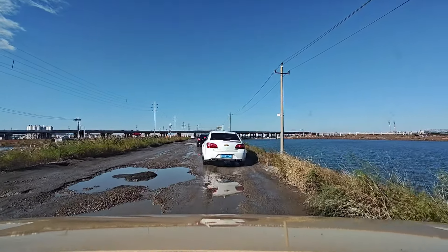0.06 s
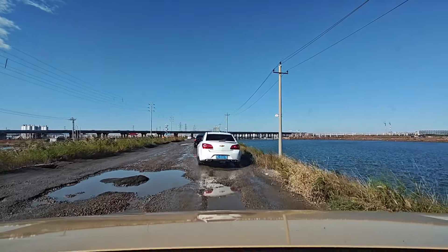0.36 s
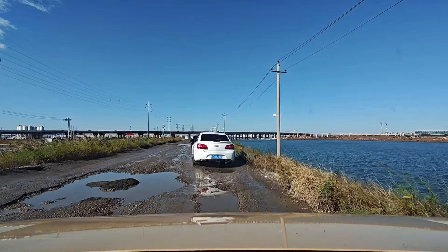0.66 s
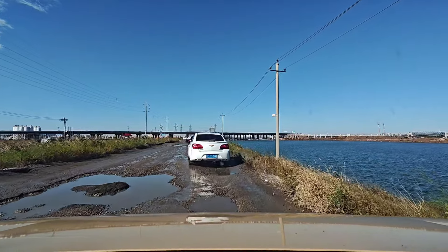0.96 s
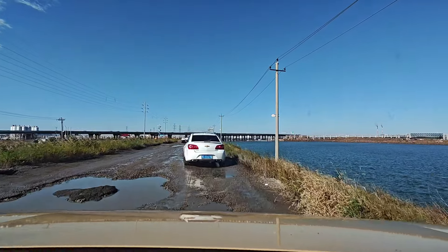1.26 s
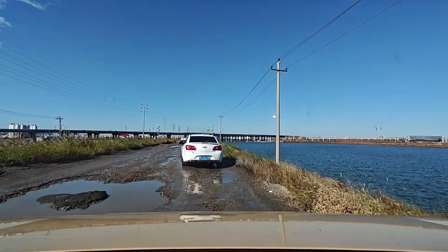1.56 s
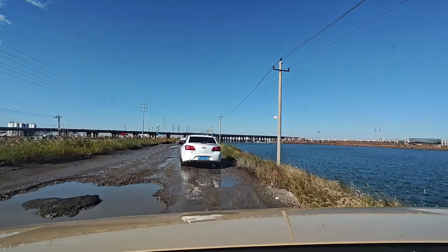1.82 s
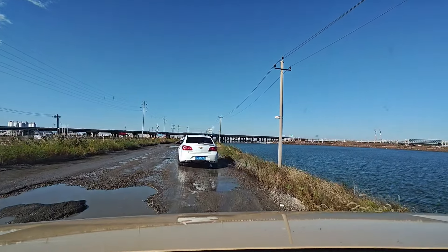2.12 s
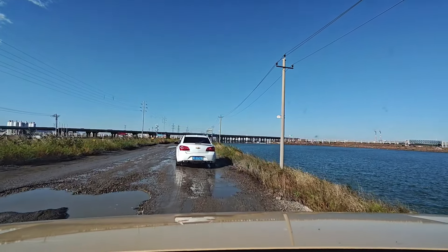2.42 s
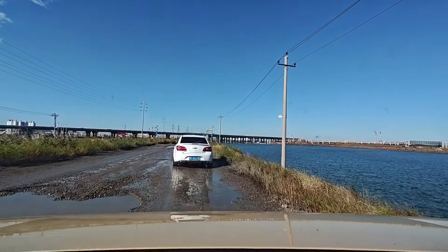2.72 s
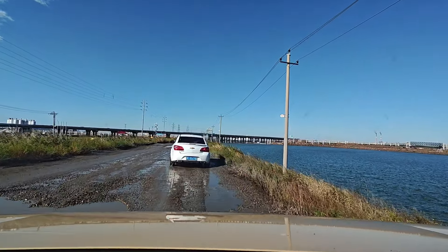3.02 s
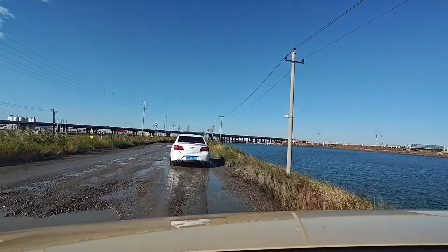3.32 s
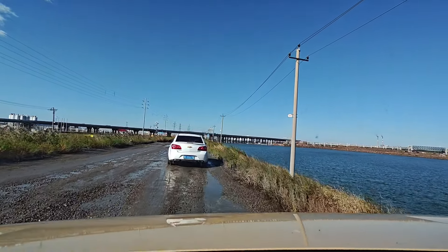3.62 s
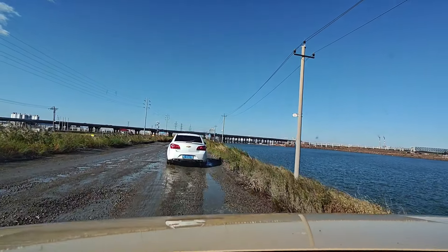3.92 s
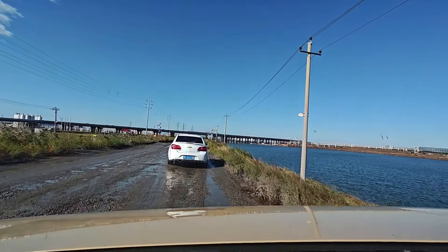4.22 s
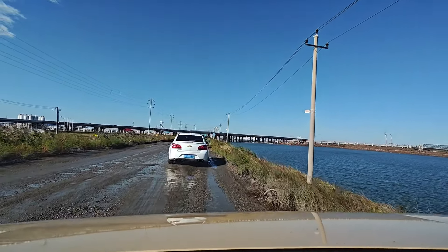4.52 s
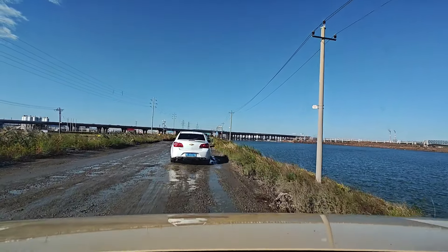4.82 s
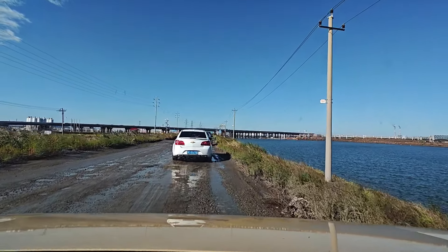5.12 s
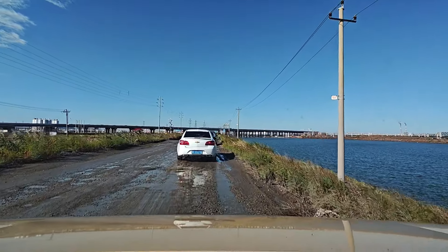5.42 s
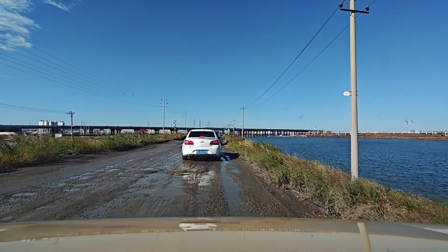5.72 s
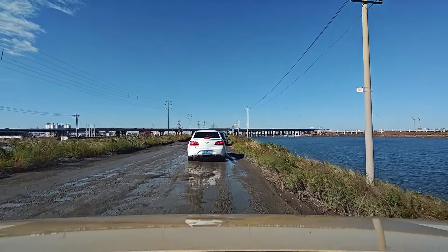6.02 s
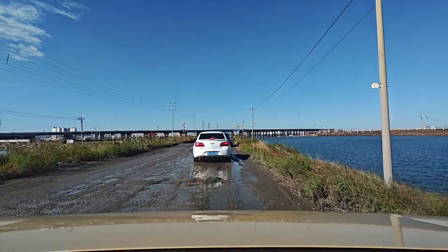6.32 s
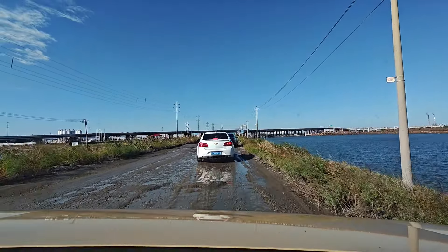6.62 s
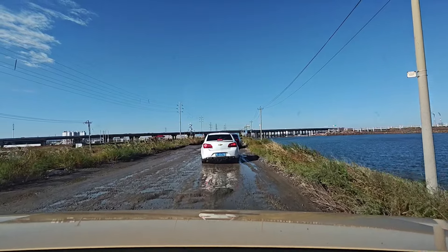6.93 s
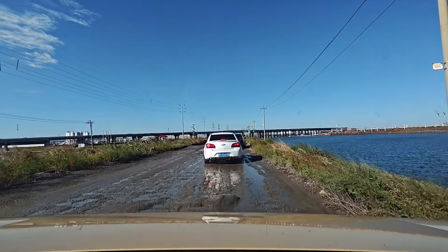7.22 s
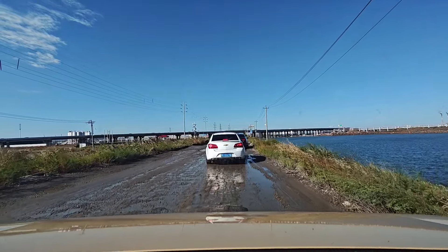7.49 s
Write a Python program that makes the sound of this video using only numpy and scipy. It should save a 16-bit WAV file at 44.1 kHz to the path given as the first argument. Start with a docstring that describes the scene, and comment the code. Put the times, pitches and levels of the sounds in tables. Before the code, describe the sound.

A low, throbbing tyre rumble and engine drone run for about eight seconds, heard from inside a car crawling along a wet, potholed dirt road. Faint grit crackles under the wheels. A dull thump and light plastic rattles open the sound. From about 1.3 to 2.2 seconds the engine rises in pitch and level, with knocks near 1.4 and 1.8, then eases. A firm thump lands at 2.7 seconds. From 3.3 to 4.6 the suspension knocks repeatedly and the cabin booms, hardest at 4 seconds. Loose trim clacks, chatters and pings with the jolts, loudest between 4 and 5.4 seconds, with a few tiny squeaks and brief swells of gritty high hiss. Further thumps come around 5.6, 5.9 and 6.7 seconds as the rattles thin out. From 6.5 seconds the engine pulls again and the rumble grows, with scattered knocks and clicks to the end.

```python
"""A low tyre rumble and an engine drone fill a car that crawls along a wet, potholed dirt road.
The tyres shake the body, the engine swells when it pulls, and wet grit crackles under the wheels.
Potholes thump through the suspension and make the cabin air boom. Loose trim chatters, pings and
squeaks with the jolts, and a gritty high hiss swells briefly around the louder rattles."""
import sys
import numpy as np
from scipy import signal
from scipy.fft import rfft, irfft, next_fast_len
from scipy.io import wavfile
from scipy.ndimage import uniform_filter1d, minimum_filter1d

SR = 44100
rng = np.random.default_rng(int(sys.argv[2]) if len(sys.argv) > 2 else 0)


def file_out(sig):
    """Save sig as 16-bit WAV at sys.argv[1]."""
    # one column per channel
    cols = np.atleast_2d(sig).T
    # limit, then scale
    lim = np.clip(cols, -1, 1)
    pcm = np.round(lim * 32767).astype(np.int16)
    wavfile.write(sys.argv[1], SR, pcm)


N = 342039
TIME = np.arange(N) / SR


def undb(db):
    """Decibels to gain."""
    return 10 ** (np.asarray(db) / 20)


def unit(x):
    """Scale to an rms of one."""
    return x / np.sqrt(np.mean(x ** 2) + 1e-20)


def freqs(x):
    """Frequency axis of a sound's spectrum."""
    return np.maximum(np.fft.rfftfreq(next_fast_len(x.shape[-1]), 1 / SR), 1)


def shape(x, gain):
    """Filter by a gain for each frequency."""
    size = next_fast_len(x.shape[-1])
    return irfft(rfft(x, size) * gain, size)[..., :x.shape[-1]]


def colour(x, points):
    """EQ through (Hz, dB) points joined on a log-frequency axis."""
    hz, db = np.transpose(points)
    return shape(x, undb(np.interp(np.log(freqs(x)), np.log(hz), db)))


def band(x, lo_hz, hi_hz):
    """Causal band-pass."""
    return signal.sosfilt(signal.butter(3, [lo_hz, hi_hz], "band", fs=SR, output="sos"), x)


def walk(rate_hz):
    """Smooth random drift with a spread near one."""
    knots = rng.standard_normal(4096)
    return np.interp(TIME * rate_hz, np.arange(len(knots)), knots)


def add(out, s, sound):
    """Mix a sound in from time s."""
    start = int(np.clip(s * SR, 0, N - 1))
    out[:, start:start + sound.shape[-1]] += sound[..., :N - start]


def ring_out(t, rise_s, t60_s):
    """Envelope of a struck part: a short push, then free decay."""
    return (1 - np.exp(-t / rise_s)) * undb(-60 * t / t60_s)


def at_ports(common, left, right, bearing=1, lag_s=0.00064):
    """Sound from the right (bearing 1) reaches the left mic port late; each has its own reflections."""
    return np.array([np.roll(common, int(bearing * lag_s * SR)) + left, common + right])


# Stereo width of the road noise: freq_hz, side_minus_mid_db
ROAD_WIDTH = [(30, -24), (80, -11.5), (170, -14), (280, -12), (500, -2), (1000, 1.5)]
def road_noise():
    """Noise of the body panels: alike left and right in the bass, wide above."""
    mid, side = rng.standard_normal((2, N))
    return mid + colour(side, ROAD_WIDTH) * np.array([[1], [-1]])


# Bass-heavy tone of the car body: freq_hz, gain_db
ROAD_COLOUR = [(18, 4), (48, 7.5), (141, -3), (167, -9.5), (215, -10.5), (297, -17), (420, -24), (520, -27),
               (610, -32), (760, -26.5), (860, -31.5), (970, -26), (1045, -26), (1150, -34), (1500, -33.5),
               (2500, -37)]
def rumble(level_db, lo_hz, hi_hz, lumpy_db, lumps_per_s):
    """One register of the body shaken by the tyres; lumps in the dirt make it throb."""
    noise = band(colour(road_noise(), ROAD_COLOUR), lo_hz, hi_hz)
    return unit(noise * undb(lumpy_db * walk(lumps_per_s))) * undb(level_db)


# The engine pulls twice and coasts between: time_s, firing_hz, level_db
ENGINE_REVS = [(0, 29.46, -25.5), (1, 28.73, -29.5), (1.3, 46.14, -22), (1.549, 55, -18),
               (1.8, 58.48, -20.5), (2.1, 55, -17), (2.351, 46.05, -25), (3.2, 45.2, -22.5),
               (4.3, 43.03, -30), (5.5, 41.02, -26), (6.35, 43.73, -30), (6.519, 49.03, -18),
               (6.78, 54.3, -17.5), (6.97, 50.03, -25), (7.2, 48.36, -17), (7.518, 48.96, -15.5),
               (7.76, 57.6, -16)]
# Partials of the drone: multiple_of_firing_rate, level_db
ENGINE_ORDERS = [(.5, -24), (1, -1), (1.5, -36), (2, -8), (3, -32), (4, -13)]
def engine(wander=0.0056, flutter_db=0.5):
    """The low orders of a four-cylinder engine boom in the cabin, each a little unsteady."""
    s, hz, db = np.transpose(ENGINE_REVS)
    firing_hz = np.interp(TIME, s, hz) * (1 + wander * walk(18))
    phase = 2 * np.pi * np.cumsum(firing_hz) / SR
    drone = sum(undb(order_db + flutter_db * walk(7.7)) * np.sin(order * phase)
                for order, order_db in ENGINE_ORDERS)
    return unit(drone) * undb(np.interp(TIME, s, db))


# Broad tone of the plastic trim: freq_hz, gain_db
TRIM_COLOUR = [(300, 10), (520, 10.5), (760, 4), (880, 2.5), (1100, -2.5), (1400, -4.5), (1750, -6.5),
               (2100, -7.5), (2900, -11.5), (3700, -10.5), (5400, -10), (7200, -8), (8500, -15.5),
               (13500, -15.5), (15500, -22)]
# Its narrow resonances: centre_hz, width_hz, lift_db
TRIM_MODES = [(1050, 110, 5), (1420, 110, 2), (2030, 90, 2.5), (2250, 70, 3), (2500, 140, 3.5),
              (3270, 110, 3.5), (6400, 300, 2)]
def trim_tone(x):
    """The trim lends its colour and resonances to whatever sounds through it."""
    axis_hz = freqs(x)
    lift_db = sum(db / (1 + (2 * (axis_hz - hz) / width) ** 2) for hz, width, db in TRIM_MODES)
    return shape(colour(x, TRIM_COLOUR), undb(lift_db))


def crackle(noise, grains_per_s, spread_db, t60_s, lo_hz, hi_hz):
    """Many small grains and a few large ones strike the underbody; each leaves a short, noisy ring."""
    sizes = undb(spread_db * np.minimum(rng.exponential(size=N), 3.5))
    strikes = (rng.random(N) < grains_per_s / SR) * sizes ** 2
    decay = np.exp(-2 * np.log(1000) / (t60_s * SR))
    energy = signal.lfilter([1], [1, -decay], strikes)
    return unit(band(noise * np.sqrt(energy), lo_hz, hi_hz))


# Brief swells of gritty high hiss around the louder rattles: peak_s, half_length_s, level_db
HISS_SWELLS = [(1.774, 0.28, -56), (3.44, 0.046, -43.5), (3.79, 0.069, -44), (4.467, 0.091, -46.5),
               (4.766, 0.046, -51), (5.107, 0.084, -47.5), (7.05, 0.029, -48.5)]
def hiss_level(grit_db, clump_db=2.0, clumps_per_s=22):
    """Level of the gritty hiss in dB: the road's own grit plus brief swells, all in clumps."""
    swells = sum(undb(db) ** 2 * np.exp(-np.minimum(((TIME - s) / half_s) ** 2, 20))
                 for s, half_s, db in HISS_SWELLS)
    return 10 * np.log10(undb(grit_db) ** 2 + swells) + clump_db * walk(clumps_per_s)


def gravel(hiss_db, stones_db, chips_db=-4.5):
    """Wet grit sizzles in the wheel arches, chips tick on the floor pan, stones crunch under the tread."""
    noise = trim_tone(at_ports(*rng.standard_normal((3, N))))
    fine = crackle(noise, grains_per_s=600, spread_db=3.0, t60_s=0.045, lo_hz=2980, hi_hz=18000)
    chips = crackle(noise, grains_per_s=220, spread_db=5.5, t60_s=0.038, lo_hz=1630, hi_hz=7040)
    stones = crackle(noise, grains_per_s=190, spread_db=9.5, t60_s=0.11, lo_hz=823, hi_hz=2350)
    return fine * undb(hiss_db) + chips * undb(hiss_db + chips_db) + stones * undb(stones_db)


# Wheels hitting holes: start_s, knock_db, knock_pitch_hz, knock_t60_s, boom_db, clunk_db
POTHOLES = [(0.003,-7,144,0.072,-14,-35), (0.624,-12.5,249,0.14,-26,-46), (1.388,-6.5,272,0.065,-13,-23.5),
            (1.829,-6.5,146,0.13,-12.5,-27), (2.345,-17,308,0.12,-20,-18), (2.46,-21.5,386,0.14,-19,-31),
            (2.672,-1.5,214,0.04,-1,-24.5), (2.745,-19.5,218,0.29,-29,-31), (2.999,-15.5,236,0.16,-19,-21),
            (3.3206,-4.5,217.4,0.33,-28,-26), (3.358,-6,205,0.1,-4,-43), (3.429,-6,166.5,0.086,-10,-48),
            (3.46,-12,203.4,0.23,-4.5,-39), (3.898,-4.5,195,0.18,-17,-19.5), (3.92,-1,174,0.045,-16,-36),
            (4.002,-29,337,0.068,-19,-23.5), (4.036,4.5,220,0.037,1,-27.5), (4.481,-13,291,0.1,-28,-26),
            (4.532,-6,203,0.091,-32,-15.5), (4.553,-1.5,175,0.083,-27,-29),
            (5.126,-14.5,249.7,0.27,-16.5,-28), (5.341,-26,326,0.09,-34,-21.5),
            (5.563,-4,208,0.073,-3.5,-37), (5.877,-7.5,269.4,0.1,-12,-37), (6.429,-21.5,317.7,.15,-22,-33),
            (6.444,-21.5,320,0.11,-24,-19.5), (6.638,-7.5,252,0.066,-22,-37), (6.672,-8.5,155,0.12,-17,-36),
            (6.692,-8,162,0.12,-23,-39), (6.915,-15,315,0.076,-15,-22), (7.048,-29,152,.11,-1.5,-39),
            (7.608,-14,224.6,0.16,-20,-30), (7.705,-16.5,221,0.15,-17,-40)]
# The ring of a suspension joint: pitch_hz, level_db, t60_s
JOINT_MODES = [(304, 3, 0.11), (375, 3, 0.1), (448, 2.5, 0.097), (536, -14.5, 0.033), (720, -11, 0.049)]
def thumps(tone_db=1.5, shudder_db=-10, clunk_gain_db=1.5, boom_gain_db=2.0, boom_hz=78.9):
    """Each hole rings the suspension, shakes the panels, clunks a joint and booms the cabin air."""
    out, t = np.zeros((2, N)), TIME[:SR // 3]
    shudder = undb(shudder_db) * unit(band(road_noise(), 182, 324))
    sag = 1 + 0.22 * np.exp(-t / 0.028)  # the boom starts sharp and sags as the load eases
    boom = ring_out(t, rise_s=0.0075, t60_s=0.2) * np.sin(2 * np.pi * boom_hz * np.cumsum(sag) / SR)
    for s, knock_db, hz, t60_s, boom_db, clunk_db in POTHOLES:
        here = np.minimum(int(s * SR) + np.arange(len(t)), N - 1)
        tone = undb(tone_db) * np.sin(2 * np.pi * hz * t)
        knock = undb(knock_db) * ring_out(t, 0.0019, t60_s) * (tone + shudder[:, here])
        clunk = 0
        for mode_hz, mode_db, mode_t60_s in JOINT_MODES:
            loaded_hz = mode_hz * (1 + 0.052 * rng.standard_normal())  # the load detunes each mode
            phase = 2 * np.pi * loaded_hz * t + 1.67 * rng.standard_normal((2, 1))  # sides out of step
            clunk += undb(mode_db) * ring_out(t, 0.001, mode_t60_s) * np.sin(phase)
        add(out, s, knock + undb(clunk_db + clunk_gain_db) * clunk + undb(boom_db + boom_gain_db) * boom)
    return out


def trim_click(t60_s=0.04, echo_db=8.8, diffuse_db=4.0):
    """One plastic click and its dense returns from the glass and panels."""
    t = TIME[:SR // 20]
    common, left, right = rng.standard_normal((3, len(t))) * undb(-60 * t / t60_s)
    echo_gain = undb(echo_db) / np.sqrt(2 * np.sum(common ** 2))
    diffuse_gain = echo_gain * undb(diffuse_db)
    click = (t == 0) + echo_gain * common
    return at_ports(click, diffuse_gain * left, diffuse_gain * right, bearing=rng.random())


def panel_colour(spread_db=0.4, count=36):
    """The uneven resonances of one loose part, as (Hz, dB) points."""
    return np.column_stack([np.geomspace(500, 16000, count), spread_db * rng.standard_normal(count)])


# Loose trim, from hollow clack to bright tick:
# hit_s, clack_db, clatter_db, tick_db, build_s, decay_s, left_minus_right_db
RATTLES = [(0.0827, -58, -43, -55, 0.001, 0.0018, -3), (0.1053, -33, -38.5, -44, 0.0012, 0.0071, -1),
           (0.1675, -38, -35.5, -50.5, 0.0044, 0.012, -1), (0.22, -37, -43.5, -59, 0.008, 0.016, 3),
           (0.2678, -40, -43.5, -62, 0.002, 0.0058, 1), (0.349, -47, -46, -53.5, 0.0045, 0.015, -1),
           (0.42, -40, -51, -58, 0.008, 0.0078, 3), (0.475, -55.0, -41.5, -60, 0.003, 0.0067, -2),
           (0.5117, -45, -43, -48, 0.001, 0.0081, -1), (0.5774, -41, -40, -50, 0.001, 0.0081, -2),
           (0.606, -39.5, -47, -50, 0.002, 0.022, -2), (0.7716, -44, -47, -77, 0.002, 0.0098, -2),
           (0.9223, -33, -38, -52.5, 0.0011, 0.01, 3), (1.065, -38.5, -49.5, -62, 0.0032, 0.0085, 6),
           (1.2714, -49, -57, -54.5, 0.002, 0.0073, 1), (1.388, -36, -49.0, -52.5, 0.004, 0.025, -1),
           (1.7104, -32.5, -44, -51, 0.001, 0.022, 0), (1.745, -51.5, -44, -47, 0.004, 0.016, -2),
           (1.772, -30.5, -38, -51, 0.006, 0.032, -1), (2.137, -38, -33, -40.5, 0.014, 0.016, 0),
           (2.161, -35, -41, -46, 0.0047, 0.027, 0), (2.3436, -29, -37, -65, 0.0088, 0.012, -1),
           (2.4055, -30.5, -33, -38, 0.00096, 0.0095, -0.5), (2.465, -34, -45, -66, 0.008, 0.024, 1),
           (2.512, -41, -42, -50, 0.014, 0.017, 0), (2.6726, -39, -43, -49.5, 0.0011, 0.004, -2),
           (2.7186, -34, -58, -55, 0.0027, 0.025, 4), (2.811, -40, -33.5, -38.5, 0.0065, 0.015, -1),
           (2.845, -34, -39.5, -47, 0.005, 0.029, 0), (2.927, -28, -45.5, -47, 0.0037, 0.0061, 1),
           (3.0005, -30, -39.5, -43, 0.001, 0.019, -0.5), (3.065, -35, -45, -48.5, 0.008, 0.074, -1),
           (3.124, -45, -48, -42, 0.0038, 0.0076, -2), (3.2331, -53, -38, -51, 0.003, 0.015, 1),
           (3.3094, -36.5, -41, -45.5, 0.004, 0.071, 0), (3.415, -37, -35, -48, 0.014, 0.043, 0),
           (3.4767, -46, -35, -46, 0.0089, 0.017, -2), (3.655, -45, -39, -59, 0.001, 0.0045, -2),
           (3.7694, -28, -32, -46, 0.016, 0.0097, -1.5), (3.8, -34.5, -35.5, -45.5, 0.006, 0.009, -1),
           (3.8357, -47, -32.5, -39, 0.003, 0.0089, -1), (3.898, -30, -36.5, -56, 0.0022, 0.011, -5),
           (3.9829, -36, -35, -42, 0.001, 0.018, -2), (4.0022, -29.5, -35, -41, 0.0038, 0.027, 0.5),
           (4.036, -29.5, -37, -44, 0.0028, 0.0069, 0), (4.1782, -32, -24.5, -29.5, 0.011, 0.026, -0.5),
           (4.2229, -32.5, -28.5, -36, 0.0056, 0.011, -2), (4.352, -43, -36, -44, 0.0084, 0.0089, -1),
           (4.4545, -31, -39, -47, 0.0011, 0.024, -1), (4.481, -30, -31.5, -37.5, 0.019, 0.02, -1),
           (4.5189, -31, -28.5, -36, 0.0017, 0.017, -4), (4.5305, -28, -34, -36.5, 0.002, 0.015, 0),
           (4.684, -45, -47, -47, 0.001, 0.013, 0), (4.705, -29.5, -37.5, -48, 0.0053, 0.043, -2),
           (4.7344, -33, -55, -58, 0.003, 0.018, 1), (4.8637, -38.5, -38, -43.5, 0.022, 0.011, 1),
           (5.02, -37, -37.5, -50.5, 0.003, 0.01, 2), (5.0825, -33.5, -36, -44, 0.011, 0.033, 1),
           (5.1379, -32, -37.5, -43, 0.0034, 0.015, -3), (5.1791, -37, -39, -60, 0.0018, 0.0093, -3),
           (5.224, -48, -41, -47, 0.004, 0.013, -1), (5.342, -29, -30, -37.5, 0.015, 0.013, -1.5),
           (5.452, -52, -44.5, -58, 0.003, 0.0093, -2), (5.565, -52, -43.5, -50, 0.001, 0.014, 0),
           (5.601, -47, -44, -52, 0.032, 0.028, 0), (5.675, -55.5, -52, -53, 0.011, 0.035, 2),
           (5.878, -48, -46, -43.5, 0.003, 0.015, -2), (5.9934, -29, -52, -54.5, 0.0046, 0.019, -2),
           (6.1532, -31.5, -36.5, -55, 0.0023, 0.0092, 1), (6.268, -41, -51, -77, 0.00096, 0.0041, 14),
           (6.428, -33.5, -48.5, -61, 0.0044, 0.066, 0), (6.6386, -46, -49, -44, 0.0069, 0.017, -1),
           (6.8765, -33, -35, -40, 0.0093, 0.013, 1), (6.9155, -27.5, -42.5, -67, 0.0027, 0.0058, -3),
           (6.975, -49, -44, -51, 0.0022, 0.045, -2), (7.0524, -35, -42, -53, 0.0049, 0.019, -3),
           (7.078, -38, -40.5, -54, 0.006, 0.014, 3), (7.22, -43, -49, -55.5, 0.0036, 0.0081, -1),
           (7.3153, -32.5, -42, -46, 0.019, 0.016, -1), (7.3847, -35, -44, -49, 0.008, 0.0095, 0),
           (7.6105, -41, -45.5, -49.5, 0.004, 0.021, -1)]
def rattles(extra_rows, gains_db=(-1.0, 1.0, 1.5), contacts_per_s=2400, settle_power=0.87):
    """A jolted panel starts to buzz, hits hard and chatters to rest; each rings in its own way."""
    out, hit = np.zeros((2, N)), SR // 20
    t = TIME[:SR // 6] - hit / SR
    bands_hz = (470, 1250), (1250, 3800), (4000, 18000)  # clack, clatter, tick
    for s, *levels_db, build_s, decay_s, pan_db in RATTLES + extra_rows:
        buzz = 0.4 * np.exp(-abs(t) / build_s)
        settle = np.exp(-(abs(t) / decay_s) ** settle_power)
        touches = rng.random(len(t)) < contacts_per_s / SR
        contacts = touches * rng.uniform(-1.43, 1, len(t)) ** 3 * np.where(t < 0, buzz, settle)
        contacts[hit] += 1.8  # the one hard hit
        burst = trim_tone(signal.fftconvolve(contacts[None], trim_click())[:, :len(t)])
        burst = colour(burst, panel_colour()) * undb([[pan_db / 2], [-pan_db / 2]])
        for edges_hz, db, gain_db in zip(bands_hz, levels_db, gains_db):
            part = band(burst, *edges_hz)
            attack_rms = np.std(part[:, hit:hit + SR // 60])
            add(out, s - hit / SR, part * undb(db + gain_db) / attack_rms)
    return out


def small_rattle_rows(tread_db, per_s=4, build_s=0.0015, decay_s=0.011):
    """Chance rows like those of RATTLES: faint dry ticks, louder on the stonier stretches."""
    count = int(per_s * N / SR)
    jitter, softer_db, duller_db = rng.uniform(-1, 1, (count, 3)).T
    times = (np.arange(count) + 0.5 + jitter / 2) / per_s
    levels_db = np.interp(times, TIME, tread_db) - 4 - softer_db
    ticks_db = levels_db - 11.5 - duller_db
    return [(s, db, db, tick_db, build_s, decay_s, 0) for s, db, tick_db in zip(times, levels_db, ticks_db)]


# Hard contacts that set one small part ringing: start_s, centre_hz, level_db, t60_s
PINGS = [(0.0827, 1530, -32, .025), (0.1045, 1200, -35, .06), (0.9233, 1170, -33.5, 0.036),
         (1.71, 5800, -39.5, .05), (2.343, 1240, -24, .035), (2.346, 740, -22, 0.045),
         (2.405, 1330, -32, 0.028), (2.4105, 7340, -41, .03), (2.405, 11900, -45, .03),
         (2.718, 790, -35, 0.055), (2.808, 9040, -42, .04), (2.817, 1640, -33, .025),
         (2.928, 720, -25, .04), (3.0005, 690, -23, .04), (3.837, 1270, -31, 0.042),
         (3.983, 10500, -46, 0.076), (4.001, 1360, -27, 0.02), (4.039, 1870, -33, 0.084),
         (4.179, 1290, -28, 0.036), (4.1795, 6600, -44, 0.03), (4.189, 12500, -32, 0.044),
         (4.2252, 1520, -27, 0.035), (4.227, 2610, -28, .03), (4.3525, 1740, -31, 0.043),
         (4.4535, 7200, -37, .03), (4.4809, 1400, -25, .04), (4.5185, 1490, -31.5, 0.053),
         (4.529, 1450, -25.5, 0.056), (4.531, 13000, -40, .05), (5.1376, 1184, -32, 0.04),
         (5.179, 2070, -32, 0.082), (5.346, 1126, -23, 0.053), (5.3465, 2980, -28, .04),
         (5.878, 6466, -41, .04), (5.9933, 975, -32, .04), (6.745, 1500, -35.5, 0.034),
         (6.915, 1460, -26.5, 0.032), (7.052, 1510, -28, 0.031), (7.317, 1430, -30.5, 0.048)]
def pings(rise_s=0.0005, spread=0.173, port_scatter_rad=1.83, count=7):
    """A struck part rings with a close cluster of modes that beat differently at each mic port."""
    out, t = np.zeros((2, N)), TIME[:SR // 8]
    weight = np.hanning(count + 2)[1:-1, None]
    for s, hz, db, t60_s in PINGS:
        detune = spread * (np.linspace(-1, 1, count) + rng.uniform(-1, 1, count) / count)
        phase = rng.uniform(0, 2 * np.pi, (count, 1))
        phase = phase + port_scatter_rad * rng.standard_normal((2, count, 1))
        modes = (weight * np.sin(2 * np.pi * hz * (1 + detune[:, None]) * t + phase)).sum(axis=1)
        fade = ring_out(t, rise_s, t60_s)
        fade_rms = np.sqrt(np.mean(fade ** 2)) / fade.max()
        add(out, s, undb(db) * fade_rms * unit(modes * fade))
    return out


# Rubbing trim: start_s, length_s, pitch_hz, level_db, second_partial_db
SQUEAKS = [(1.614, 0.083, 1075, -39.5, -3.5), (2.571, 0.023, 1086, -34, -25), (2.925, 0.031, 697, -28, -27),
           (3.536, 0.018, 1870, -38.5, -14), (3.874, 0.006, 2000, -24.5, -15),
           (4.861, 0.023, 1940, -33.5, -25), (5.174, 0.021, 2010, -35.5, -26)]
def squeaks(scrape_db=-6):
    """Trim sticks and slips in a brief stutter, at an unsteady pitch, with a scrape around the tone."""
    out = np.zeros((2, N))
    for s, length_s, hz, db, second_db in SQUEAKS:
        count = int(length_s * SR)
        phase = 2 * np.pi * np.cumsum(hz * (1 + 0.055 * walk(700)[:count])) / SR
        tone = np.sin(phase) + undb(second_db) * np.sin(2 * phase)
        grip = signal.windows.tukey(count, 0.5) * unit(undb(6 * walk(300)[:count]))
        scrape = unit(band(rng.standard_normal((2, count)), 0.85 * hz, 1.3 * hz))
        add(out, s, undb(db) * grip * (tone + undb(scrape_db) * scrape))
    return out


# The road under the wheels: time_s, rumble_db, wet_grit_db
RIDE = [(0.0, -28.5, -51.5), (0.3, -30, -59.5), (0.92, -33, -63.5), (1.28, -26, -58.5), (1.67, -30, -58),
        (2.23, -26.5, -59), (3.04, -29, -55.5), (3.3, -23.5, -53), (3.82, -27.5, -52.5), (4.03, -25, -55),
        (4.87, -30, -55.5), (5.17, -28, -53), (5.83, -28, -65), (6.13, -28.5, -58.5), (6.48, -26.5, -61),
        (6.69, -25.5, -58.5), (7.16, -22, -59), (7.7, -24, -55)]
def scene(usual_rumble_db=-28, usual_grit_db=-58):
    """Road, engine and jolts in the cabin; roughness and grit ride the tyre and gravel levels."""
    s, rumble_db, wet_grit_db = np.transpose(RIDE)
    rough_db = np.interp(TIME, s, rumble_db) - usual_rumble_db
    gritty_db = np.interp(TIME, s, wet_grit_db) - usual_grit_db
    tread_db = -47 + 0.2 * rough_db + 0.63 * gritty_db
    sway = rumble(-25 + 0.96 * rough_db, lo_hz=19, hi_hz=46, lumpy_db=1.0, lumps_per_s=6)
    boom = rumble(-23 + 0.95 * rough_db, lo_hz=55, hi_hz=139.3, lumpy_db=0.4, lumps_per_s=40)
    tyres = rumble(-25 + rough_db, lo_hz=153.8, hi_hz=567, lumpy_db=2.6, lumps_per_s=28)
    tread = rumble(tread_db, lo_hz=576, hi_hz=2520, lumpy_db=1.0, lumps_per_s=40)
    grit = gravel(hiss_level(-56.5 + gritty_db), stones_db=-48 + 0.88 * gritty_db)
    bed = sway + boom + tyres + tread + grit + engine()
    return bed + thumps() + squeaks() + pings() + rattles(small_rattle_rows(tread_db))


# Tonal tilt between the two mic ports: freq_hz, left_minus_right_db
CABIN_BALANCE = [(60, 0.5), (110, -0.5), (200, 1), (380, 0), (700, -0.5), (1290, 4.5), (2380, -1),
                 (4400, 1), (8120, 2.5), (15000, -1)]
def record(dry, ceiling=0.95, top_hz=15800):
    """A phone behind the windscreen: its ports differ in colour, a limiter holds peaks, the top is cut."""
    ports = np.array([colour(x, [(hz, side * db / 2) for hz, db in CABIN_BALANCE])
                      for x, side in zip(dry, (1, -1))])
    headroom = np.minimum(1, ceiling / (np.abs(ports).max(axis=0) + 1e-9))
    gain = uniform_filter1d(minimum_filter1d(headroom, size=900), size=900)
    return signal.sosfilt(signal.ellip(10, 0.1, 80, top_hz, fs=SR, output="sos"), ports * gain)


dry = scene()
out = record(dry)
file_out(out)
```